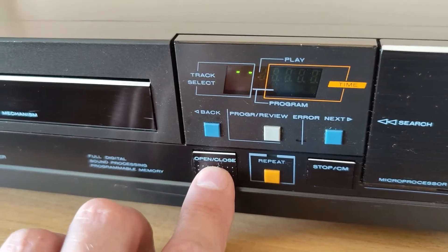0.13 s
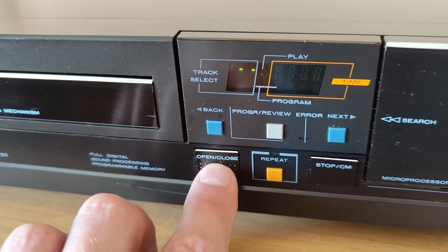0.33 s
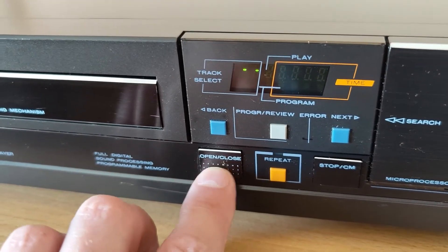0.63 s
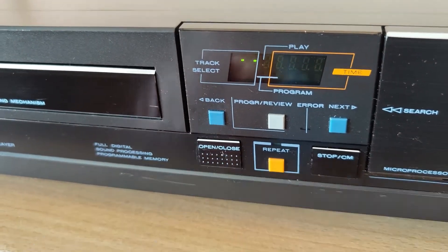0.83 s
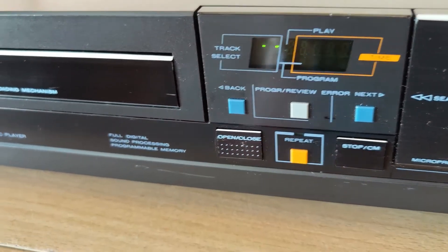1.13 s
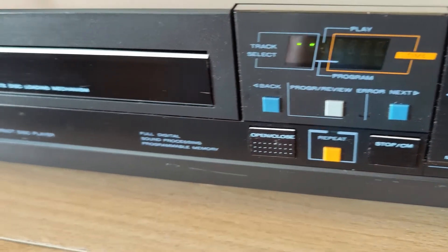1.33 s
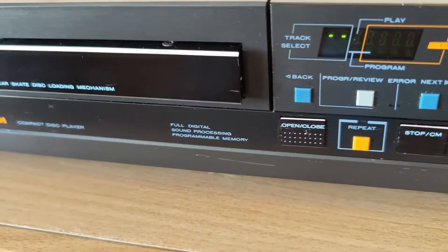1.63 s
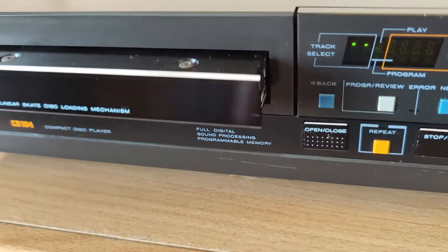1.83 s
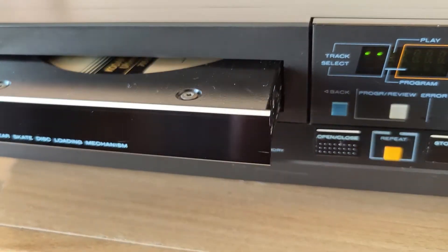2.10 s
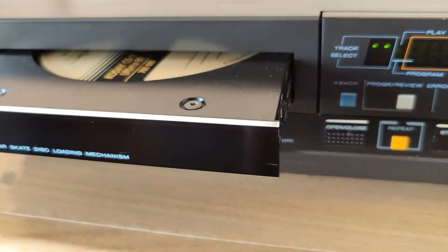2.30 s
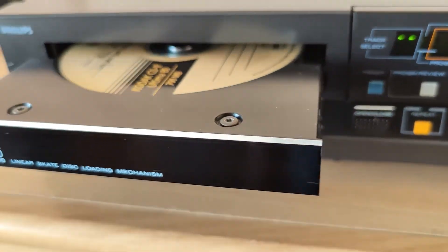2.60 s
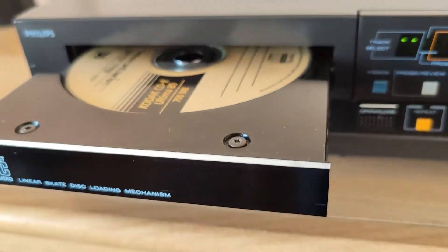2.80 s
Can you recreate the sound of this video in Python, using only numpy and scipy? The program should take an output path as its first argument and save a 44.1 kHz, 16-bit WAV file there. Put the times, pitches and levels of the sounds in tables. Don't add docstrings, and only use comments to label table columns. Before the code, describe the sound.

A disc player's tray opens, heard close in a quiet room with a low hum: a button clicks down and up, a latch ticks, then the tray scrapes loose, rolls out on a small motor and knocks its stop.

```python
import sys
import numpy as np
from scipy import signal
from scipy.fft import rfft, irfft
from scipy.io import wavfile
from scipy.ndimage import uniform_filter1d

SR = 44100
rng = np.random.default_rng(int(sys.argv[2]) if len(sys.argv) > 2 else 0)


def bounce(signal):
    frames = np.transpose(np.atleast_2d(signal))
    limited = np.clip(frames, -1, 1)
    pcm = np.round(limited * 32767).astype(np.int16)
    wavfile.write(sys.argv[1], SR, pcm)


def ratio(d):
    e = np.asarray(d, float) / 20
    return 10 ** e


N = 130095
T = np.arange(N) / SR
HIT_T = T[:SR // 3]

# start_s, pitch_hz, level_db
LOW_DRONE = [(0.0, 54.47, -57), (0.27, 53.87, -41), (0.54, 53.28, -36.5), (0.8, 53.3, -51.5),
             (1.07, 52.58, -30.5), (1.34, 53.02, -40.5), (1.61, 53.5, -40.5), (1.88, 50.85, -39),
             (2.15, 52.8, -39), (2.41, 49.65, -66), (2.68, 48.72, -44), (2.95, 49.63, -72)]
HIGH_DRONE = [(0.0, 59.3, -42), (0.27, 58.51, -36.5), (0.54, 60.5, -46), (0.8, 59.7, -36),
              (1.07, 62.06, -41), (1.34, 62.16, -49.5), (1.61, 63.2, -43), (1.88, 63.06, -43.5),
              (2.15, 64.93, -40.5), (2.41, 59.1, -41), (2.68, 60.43, -44), (2.95, 56.9, -43)]
DRONE_PHASES = [1.81, 3.51]
# multiple, level_db
DRONE_OVERTONES = [(2, -55), (3, -67)]
# pitch_hz, level_db
ROOM_COLOUR = [(80, -0.5), (120, -2), (200, -15.5), (480, -21.5), (800, -26), (2500, -31.5), (5500, -44.5),
               (16000, -48.5)]
# start_s, level_db
IDLE_SPIN = [(.76, -73), (.85, -86), (1.4, -79), (1.6, -83), (1.7, -61), (1.9, -83)]

# start_s, level_db
DISTANT_MURMUR = [(0, -72), (.14, -64), (.24, -67), (.35, -55.5), (.45, -67), (1.2, -65), (1.4, -63),
                  (1.6, -56.5), (1.7, -90)]
# start_s, level_db
SLEEVE_RUSTLE = [(1.27, -80), (1.37, -70), (1.52, -80)]
# start_s, level_db
MIC_HISS = [(0, -81), (1.65, -76), (1.9, -76.5)]

# start_s, peak_db, snap_db, tail_db
KEY_CLICKS = [
    (0.2551, -37, -22, -12.5),
    (0.6268, -27.5, 0, -8.5),
    (0.7645, -48.5, -15.5, -11.5),
    (.889, -67, -6, 0),
    (.748, -48, -32, -6),
]
# pitch_hz, level_db, t60_s
PRESSED_MODES = [(626, -26, .12), (1060, -32, 0.055), (1240, -1, 0.072), (1820, -8.5, 0.072),
                 (1925, -2.5, 0.029), (3682, -9.5, 0.034)]
# pitch_hz, level_db, t60_s
RELEASED_MODES = [(602, -14.5, 0.13), (1260, 0, 0.045), (1460, -22, 0.025), (1890, 2, 0.023),
                  (2320, -3.5, 0.024), (3680, -11.5, .04)]
# pitch_hz, level_db, t60_s
LATCH_MODES = [(644, -7, 0.11), (1030, -9, 0.06), (1378, 0, 0.087), (2245, -5, .05), (2570, -4.5, .05),
               (2773, -8, .04)]
# pitch_hz, level_db, t60_s
SNAP_MODES = [(4770, -2.5, 0.017), (6230, 10.5, 0.0054), (10740, 3.5, 0.0064), (12400, -2, .005),
              (13800, 3, 0.0067), (14200, 6, 0.0059), (15700, 4, 0.0072)]
# pitch_hz, width_hz, level_db
RATTLE_RINGS = [(7200, 370, -13), (10400, 6000, -20), (13700, 1400, -24)]
# pitch_hz, level_db
CLICK_TAIL_COLOUR = [(250, -10), (560, -2.5), (900, -5), (1300, 0.5), (2300, -2.5), (4230, -10), (7080, -9),
                     (8220, -21), (15000, -24)]
# start_s, level_db, pitch_hz
FINGER_TAPS = [
    (.255, -53, 308),
    (.905, -53, 305),
    (.94, -56.5, 306),
]

# start_s, level_db
SCRAPE_LEVEL = [(1.6, -91), (1.64, -74), (1.7, -51), (1.735, -35.5), (1.775, -38), (1.82, -37),
                (1.865, -46), (1.95, -58), (2.2, -64.5), (2.3, -80)]
# pitch_hz, level_db
RUB_COLOUR = [(120, -29), (300, -6.5), (660, 3), (1800, -8.5), (2400, -10), (6300, -4.5), (9000, -11.5),
              (16000, -24)]
# pitch_hz, width_hz, level_db
RUB_RINGS = [(504, 36, 2.5), (658, 44, -1), (878, 28, -0.5), (1840, 78, -3.5), (2930, 193, -11),
             (4840, 296, -8.5), (6470, 184, -7)]
# start_s, level_db
ROLL_LOAD = [(1.62, -74), (1.645, -47), (1.7, -44.5), (1.75, -40.5), (1.9, -43), (2.04, -48.5),
             (2.8, -48.5), (2.95, -46.5)]
# pitch_hz, level_db
CONTACT_COLOUR = [(90, 6), (200, -1), (400, -12.5), (1400, -18), (2300, -23), (3500, -32), (5000, -36),
                  (6500, -33), (10000, -46.5)]
# pitch_hz, width_hz, level_db
CASE_RINGS = [(471.6, 36, -13), (656, 27, -10), (841.2, 42, -11.5), (1050, 40, -15.5), (1231, 46, -14),
              (1380, 60, -15), (1808, 61, -17.5), (2032, 29, -22), (3570, 820, -20)]
# start_s, level_db
SHELF_BOOM = [(1.63, -70), (1.65, -58), (1.8, -46), (1.9, -50), (2.95, -50)]
# pitch_hz, width_hz, level_db
SHELF_RINGS = [(132.7, 19, 3.5), (169.4, 24.2, -4.5), (209.5, 8.7, -9)]
# start_s, level_db
BRUSH_LEVEL = [(1.95, -99), (2., -61.5), (2.4, -63.5), (2.82, -67.5), (2.86, -64)]

# start_s, peak_db, ring_hz, tail_db
GUIDE_TICKS = [(1.68, -32.5, 4520, -15), (1.722, -32, 4950, -5), (1.745, -27, 14600, -14),
               (1.757, -48, 6400, -17), (1.7865, -32, 5650, -10), (1.818, -27, 4600, -7.5),
               (1.842, -49, 7000, -20), (1.711, -26.5, 6500, 2.5), (1.729, -21, 13400, -2.5),
               (1.807, -31, 6160, -2), (1.826, -39, 6700, -7), (1.875, -31, 7300, -2.5),
               (1.9612, -30.5, 7200, -11.5), (2.0495, -35, 6900, -8)]
# start_s, peak_db, ring_hz, tail_db
CASE_KNOCKS = [(1.631, -44, 1530, -12), (1.642, -26, 1380, -21), (1.647, -32.5, 3320, -25),
               (1.737, -22, 1840, -15), (1.774, -24, 2930, -17), (2.113, -35, 6970, -10.5),
               (2.156, -41, 7200, -20), (2.239, -36.5, 4560, -3)]
# start_s, peak_db, ring_hz, tail_db
END_STOPS = [
    (2.8468, -34, 5850, -8.5),
    (2.869, -24.5, 5790, -16),
    (2.8892, -28, 5810, -19.5),
]
# pitch_hz, level_db
CRACK_COLOUR = [(880, -13), (1500, -5), (4160, -5.5), (5770, -1.5), (8000, -5), (12000, -6.5),
                (14500, -9.5), (16000, -15)]
# start_s, level_db, pitch_hz
SHELF_JOLTS = [(1.915, -31.5, 134), (1.99, -37, 134), (2.036, -37, 138), (2.15, -34, 141),
               (2.189, -33.5, 143.3), (2.286, -29.5, 131.4), (2.46, -29.5, 130.7), (2.506, -35, 133.8),
               (2.611, -41, 133.5), (2.681, -38.5, 133), (2.77, -36.5, 134.6), (2.809, -45, 132.6),
               (2.917, -39, 125)]


def curve(table, column=1):
    points = np.array(table)
    return np.interp(T, points[:, 0], points[:, column], left=-120 if table[0][0] > 0 else None)


def unit(x):
    return x / np.sqrt(np.mean(x ** 2))


def pair(floor=0.09, like_hz=680):
    f = (np.arange(N // 2 + 1) * SR / N / like_hz) ** 1.11
    side = np.maximum(0.9 * f / np.sqrt(1 + f ** 2), floor)
    mid, other = rfft(rng.standard_normal((2, N)))
    ports = mid + other * side * np.array([[1], [-1]])
    return irfft(ports / np.sqrt(1 + side ** 2), N)


def colour(x, points):
    f = np.arange(N // 2 + 1) * SR / N + 1
    hz, db = np.transpose(points)
    gain = ratio(np.interp(np.log(f), np.log(hz), db, left=-60))
    return unit(irfft(rfft(x) * gain, N))


def rings(x, table):
    total = 0
    for hz, width, db in table:
        peak = np.r_[signal.iirpeak(hz, hz / width / 1.5, SR)]
        total = total + ratio(db) * unit(signal.sosfilt(np.tile(peak, (2, 1)), x))
    return total


def walk(rate):
    k = int(SR / rate)
    steps = np.repeat(rng.standard_normal(N // k + 1), k)
    return 1.98 * uniform_filter1d(uniform_filter1d(steps, k), k)[:N]


def grit(rate, spread_db, smear_s):
    hits = (rng.random(N) < rate / SR) * ratio(spread_db * rng.exponential(size=N))
    return unit(signal.lfilter([1], [1, -np.exp(-1 / (smear_s * SR))], hits))


def dull(x, hz):
    return signal.sosfilt(signal.butter(4, min(hz, 20000), fs=SR, output="sos"), x)


def rise(seconds):
    return np.minimum(HIT_T / seconds, 1)


def fade(t60):
    return ratio(-60 * HIT_T / t60)


def ring(hz, t60, turn):
    lag = np.array([[0], [turn * min(hz / 1500, 1)]])
    return fade(t60) * rise(1.93 / hz) * np.sin(2 * np.pi * hz * HIT_T + lag)


def add(out, s, hit):
    i = int(s * SR)
    out[:, i:i + len(HIT_T)] += hit[:, :N - i]


def drones():
    low = 2 * np.pi * np.cumsum(curve(LOW_DRONE)) / SR
    high = 2 * np.pi * np.cumsum(curve(HIGH_DRONE)) / SR
    hum = ratio(curve(LOW_DRONE, 2)) * np.cos(low + DRONE_PHASES[0])
    hum = hum + ratio(curve(HIGH_DRONE, 2)) * np.cos(high + DRONE_PHASES[1])
    for multiple, db in DRONE_OVERTONES:
        hum = hum + ratio(db + 2 * walk(1)) * np.cos(int(multiple) * low)
    right = ratio(-0.1) * (hum + 21.0 * np.gradient(hum))
    air = ratio(-66 + 5.5) * colour(pair(), ROOM_COLOUR)
    rumble = ratio(-62) * rings(pair(), [(32, 4.3, 0.5), (78, 18.6, 5.0)])
    flutter_db = 1.2 * walk(20)
    spin = ratio(curve(IDLE_SPIN) + flutter_db) * rings(pair(), [(2310, 810, 8.8), (4040, 3200, 3.4)])
    return np.sqrt(2) * np.array([hum, right]) + air + rumble + spin


def hand():
    murmur_db = curve(DISTANT_MURMUR) + 2.0 * walk(24.58)
    shelf = ratio(murmur_db) * rings(pair(), [(201.0, 46.5, 1.0), (289, 65, -10.5)])
    cloth = pair() * grit(340, 0.92, 0.01)
    sleeve = ratio(curve(SLEEVE_RUSTLE)) * rings(cloth, [(490, 88, 4.0), (990, 250, 0.0), (3460, 1660, -1.0)])
    hiss = ratio(curve(MIC_HISS)) * rings(pair(), [(11800, 7700, 0)])
    return shelf + sleeve + hiss


def key():
    out = np.zeros((2, N))
    turns = rng.uniform(-1.6, 1.6, (len(KEY_CLICKS), 13))
    bodies = (PRESSED_MODES, RELEASED_MODES, LATCH_MODES, LATCH_MODES, LATCH_MODES)
    for (s, db, snap_db, tail_db), modes, turn in zip(KEY_CLICKS, bodies, turns):
        noise = pair()
        tail = colour(noise, CLICK_TAIL_COLOUR)[:, :len(HIT_T)]
        tail = dull(tail, 20000 * ratio(0.59 * snap_db))
        rattle = rings(noise[:, :len(HIT_T)], RATTLE_RINGS)
        body = sum(ratio(g) * ring(hz, t60, a) for (hz, g, t60), a in zip(modes, turn))
        snap = sum(ratio(g) * ring(hz, t60, 0.61 * a) for (hz, g, t60), a in zip(SNAP_MODES, turn[6:]))
        snap = snap + ratio(1.0) * tail * fade(0.0061) + rattle * fade(0.085)
        click = body + ratio(snap_db) * snap + ratio(tail_db) * tail * fade(0.21)
        add(out, s, ratio(db) * click)
    for s, db, hz in FINGER_TAPS:
        add(out, s, ratio(db) * rise(0.008) * ring(hz, 0.13, 0.3))
    return out


def scrape():
    rub = pair() * grit(700, 1.2, 0.0045)
    edges = ratio(-12.0 + 2.7 * walk(40.04)) * rings(rub, RUB_RINGS)
    return ratio(curve(SCRAPE_LEVEL)) * (colour(rub, RUB_COLOUR) + edges)


def rolling(start_s):
    contact = pair() * grit(1400, 0.58, 0.0058)
    waver_db = 2.5 * walk(25)
    whine_hz = 661 * (1 + 0.00777 * walk(29.72))
    whine = ratio(-13 + waver_db) * np.sin(2 * np.pi * np.cumsum(whine_hz) / SR) * (T > start_s)
    case = rings(pair(), CASE_RINGS)
    return ratio(curve(ROLL_LOAD)) * (case + whine + ratio(2.5) * colour(contact, CONTACT_COLOUR))


def thump(start_s):
    rise_s, hold_s, fall_s = 0.022, 0.032, 0.006
    u = T - start_s
    shape = np.clip(u / rise_s, 0, 1) * np.exp(-np.clip(u - rise_s - hold_s, 0, 9) / fall_s)
    return ratio(-27.5) * np.sqrt(2) * shape * np.sin(2 * np.pi * 133 * u + 1.0)


def brushes():
    bars = np.cumsum(312 * (1 + 0.0079 * walk(13.9))) / SR
    gate = (1 + 0.5 * np.cos(2 * np.pi * bars)) * (1 + 0.06 * np.cos(2 * np.pi * bars / 3))
    sparks = rings(pair(), [(6900, 1000, 0)])
    sparks = rings(sparks, [(7410, 440, -1.5), (7796, 390, -1.0), (6700, 1400, -2.5)])
    return ratio(curve(BRUSH_LEVEL)) * gate * sparks


def tray():
    free_s = 1.709
    boom = ratio(curve(SHELF_BOOM)) * rings(pair(), SHELF_RINGS)
    return scrape() + boom + rolling(free_s) + thump(free_s) + brushes()


def ticks():
    out = np.zeros((2, N))
    bright = colour(pair(), CRACK_COLOUR)
    groups = ((GUIDE_TICKS, bright), (CASE_KNOCKS, dull(bright, 6850)), (END_STOPS, dull(bright, 13800)))
    for table, noise in groups:
        for s, db, hz, tail_db in table:
            crack = np.roll(noise, -int(s * SR), axis=1)[:, :len(HIT_T)]
            ringing = rings(crack, [(hz, hz / 12, -4.0)]) * fade(0.047)
            tail = ratio(tail_db) * crack * fade(0.19)
            add(out, s, ratio(db - 10.5) * rise(0.00044) * (crack * fade(0.0088) + ringing + tail))
    return out


def jolts():
    out = np.zeros((2, N))
    for s, db, hz in SHELF_JOLTS:
        add(out, s, ratio(db) * rise(0.011) * ring(hz, 0.35, 0.3))
    return out


def scene():
    left_db = 1
    near = (key() + ticks()) * ratio(np.array([[left_db], [-left_db]]))
    return drones() + hand() + tray() + jolts() + near


def roll_off(x):
    return signal.sosfilt(signal.butter(12, 16170, fs=SR, output="sos"), x)


def record(dry):
    limit = signal.ellip(8, 0.2, 40, 16000, fs=SR, output="sos")
    mix = signal.sosfilt(limit, dry)
    return roll_off(mix)


dry = scene()
out = record(dry)
bounce(out)
```